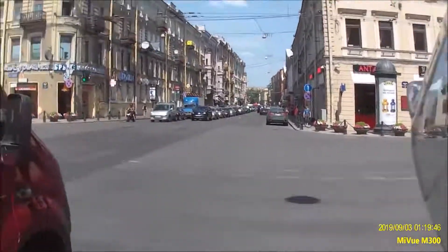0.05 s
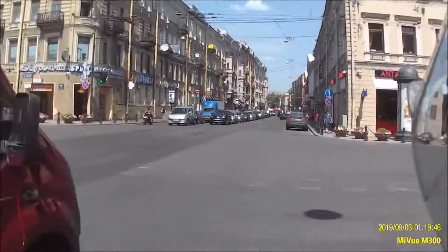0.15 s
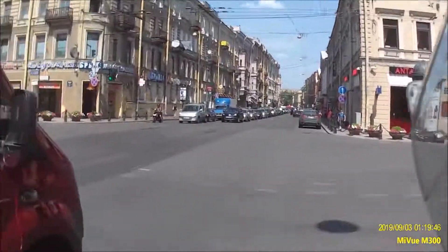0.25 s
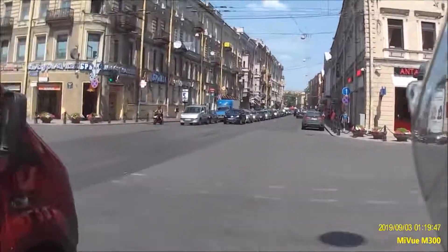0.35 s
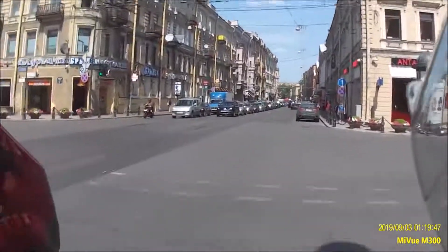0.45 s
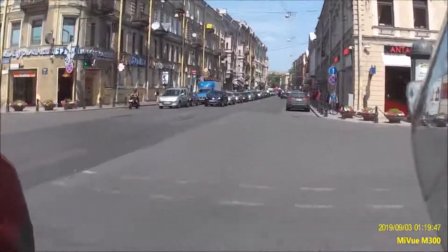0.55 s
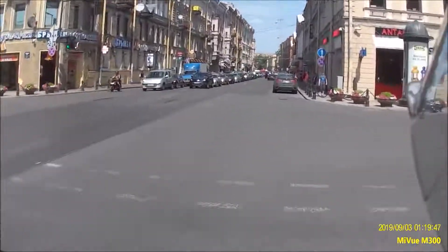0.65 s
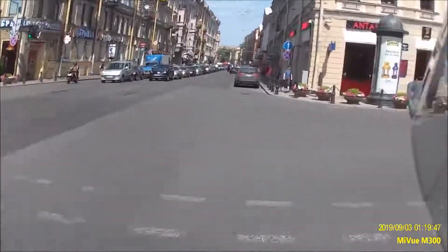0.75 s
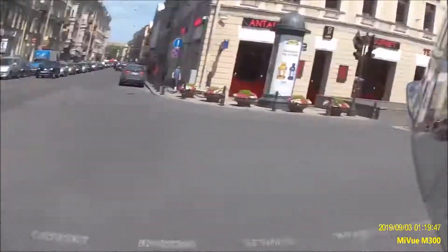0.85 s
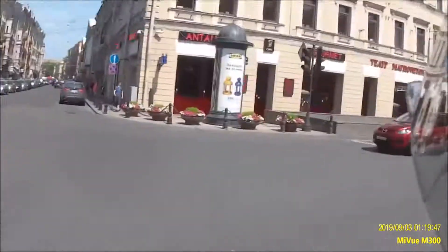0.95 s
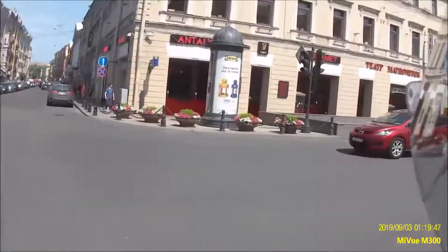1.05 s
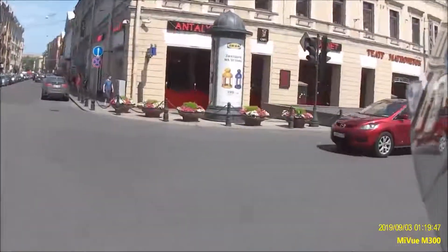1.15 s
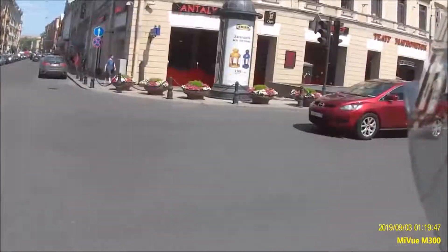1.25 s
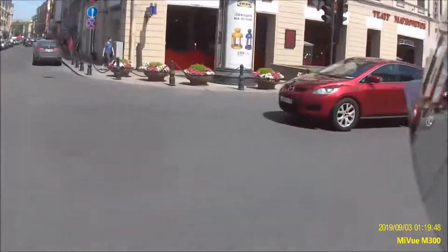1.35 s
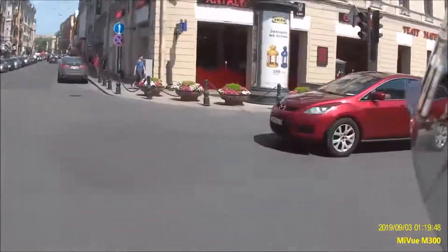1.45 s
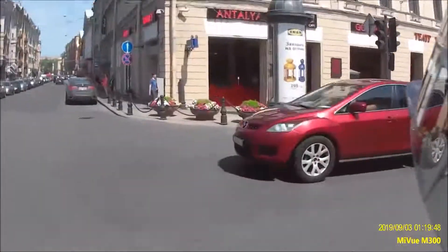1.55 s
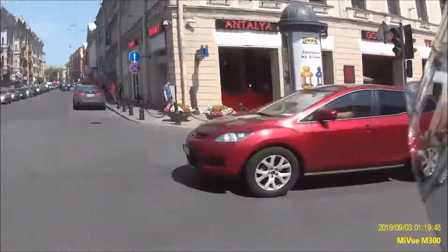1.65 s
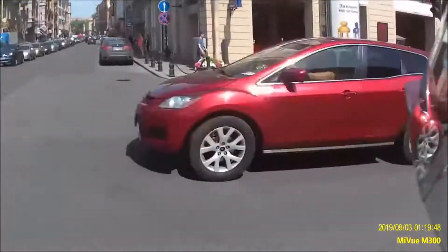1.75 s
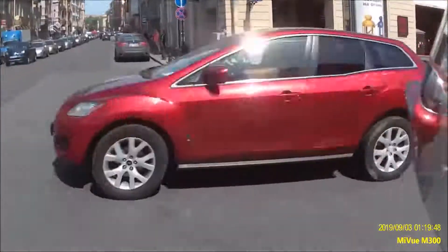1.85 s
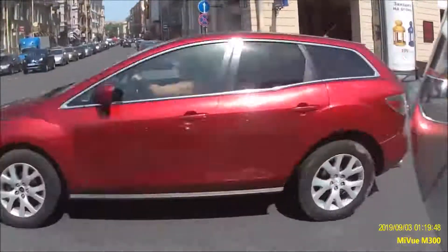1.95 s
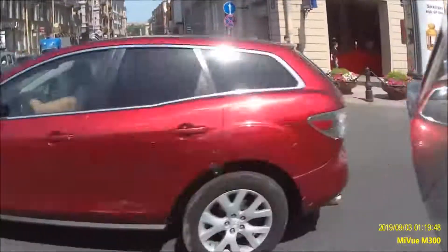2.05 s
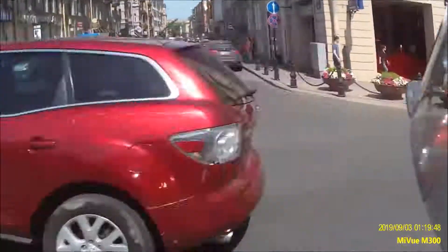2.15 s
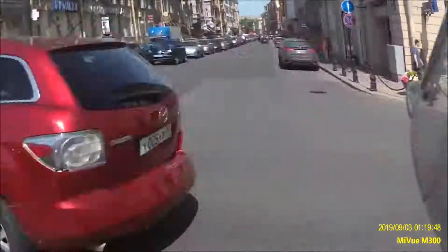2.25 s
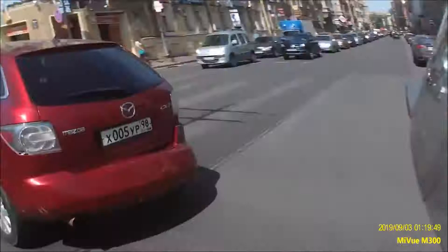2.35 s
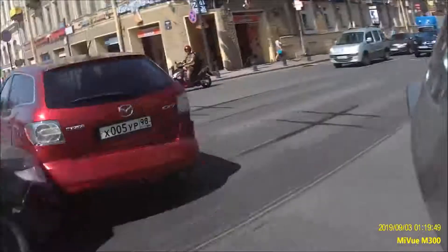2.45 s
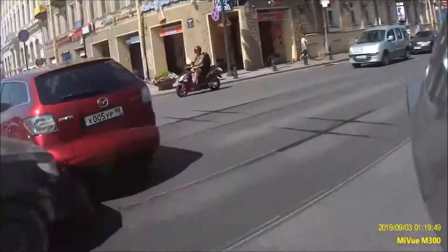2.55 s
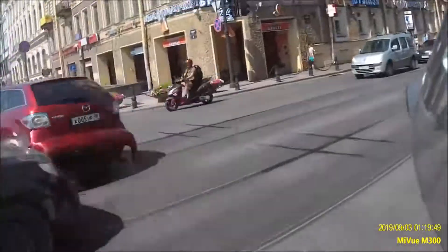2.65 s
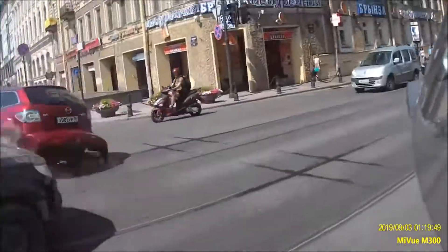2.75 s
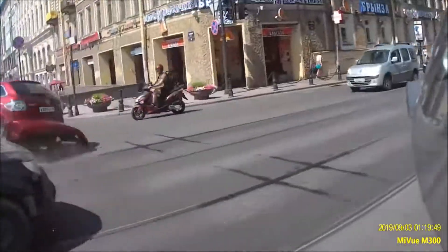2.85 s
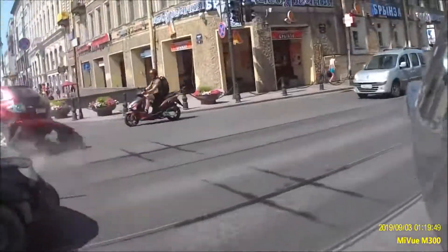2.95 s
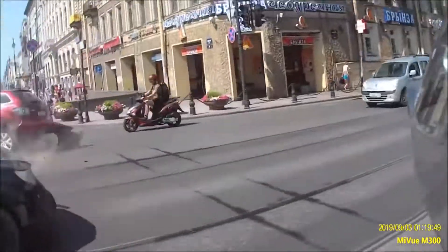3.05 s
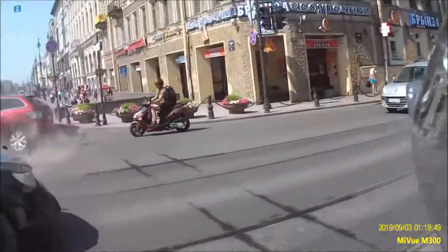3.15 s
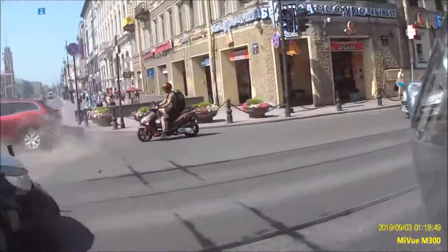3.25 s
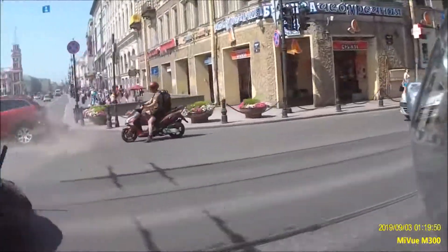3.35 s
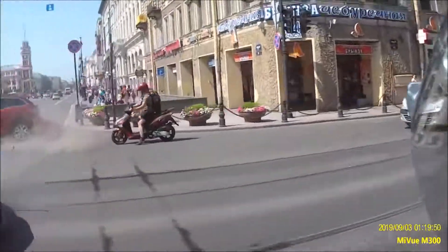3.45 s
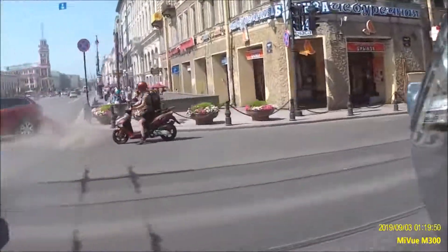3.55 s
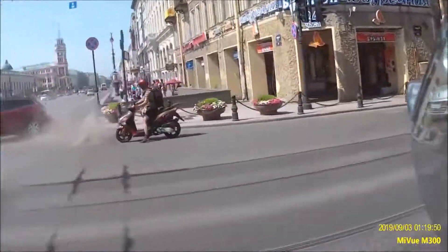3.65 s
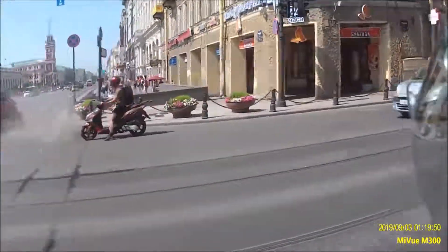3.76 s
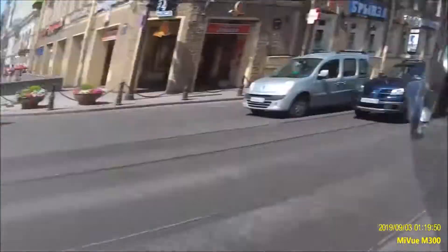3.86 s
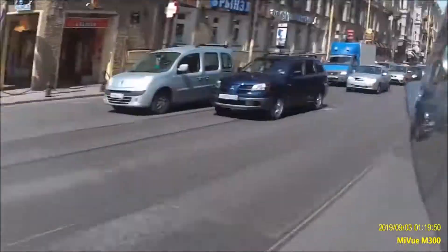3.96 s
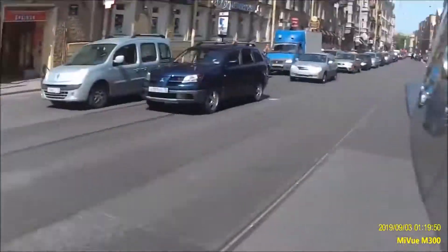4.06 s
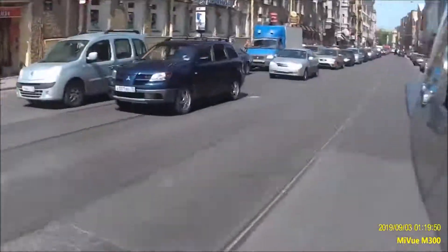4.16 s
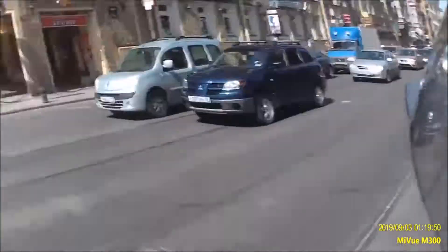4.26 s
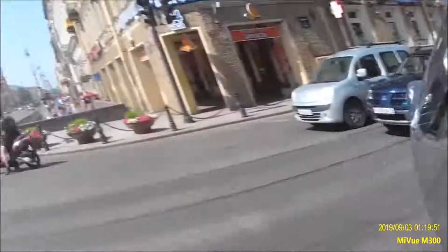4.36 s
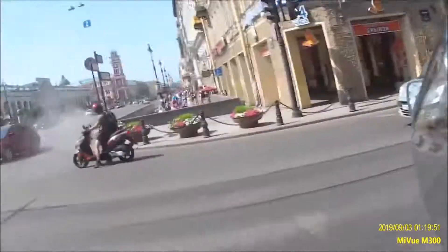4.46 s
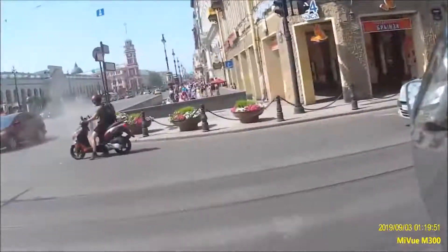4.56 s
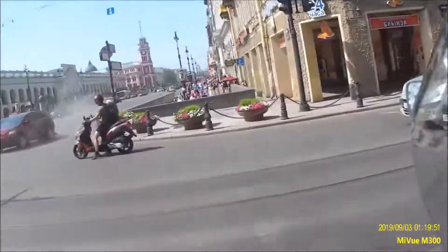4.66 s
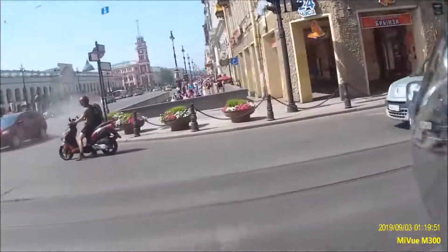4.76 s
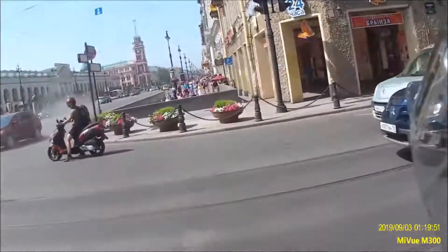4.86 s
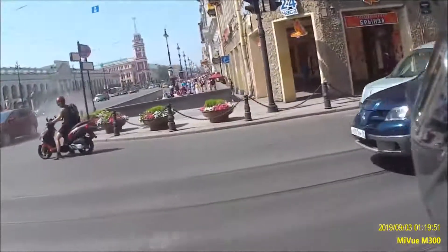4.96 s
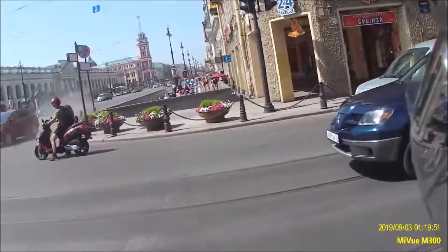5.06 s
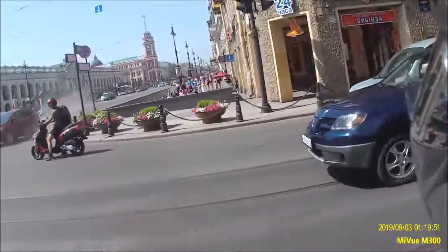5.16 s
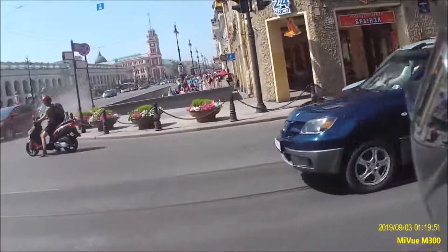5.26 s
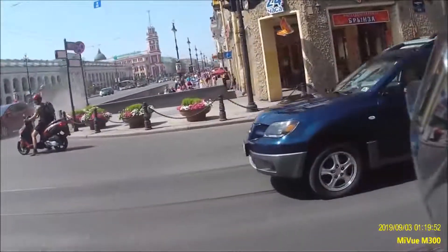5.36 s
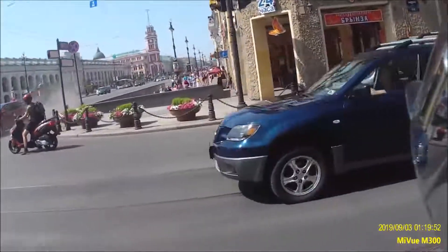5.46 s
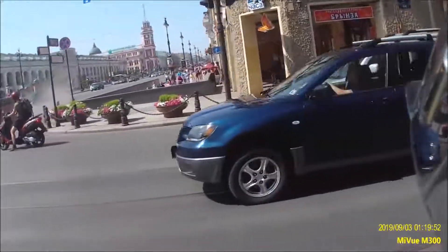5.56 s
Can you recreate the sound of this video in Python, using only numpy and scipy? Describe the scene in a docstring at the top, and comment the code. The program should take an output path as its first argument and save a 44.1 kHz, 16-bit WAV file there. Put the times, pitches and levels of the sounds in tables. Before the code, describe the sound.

A close, boxy microphone rides on a motorcycle at a city crossing, over soft distant traffic. From 0 s the engine clatters with a dry, hissy buzz, its pitch climbing to a peak near 1.8 s. Two short tyre chirps come around 1.0-1.2 s, while wind gusts rumble, flutter and knock on the housing until about 1.7 s. The revs then fall, with a very high, thin brake squeak near 2.35 s. At about 2.65 s cars collide: a hard, bright crack of bodywork with a short thud and narrow ringing noise, smaller blows following to 2.95 s. Wavering tyre squeals cluster from 2.7 to 3.9 s over rough skidding and scraping grit. Fragments rattle, strongest at 3.4-4.0 s, and house fronts scatter brief echoes. The engine sinks away; faint brake squeaks near 4.0, 5.0 and 5.3 s and settling bits end in quiet street noise.

```python
"""A motorcycle engine revs up, falls back and fades at a city crossing, heard through a small, thin housing.
Two cars collide: the bodywork cracks and thuds, with a narrow-toned noise, all from filtered clicks and noise.
Tyres squeal as wavering tones above a skid of filtered noise; grit and fragments are filtered clicks.
Brakes squeak as thin unsteady tones, house fronts scatter the crash back, wind gusts buffet the housing,
and distant traffic lies underneath as filtered noise."""
import sys
import numpy as np
from scipy import signal
from scipy.fft import rfft, irfft, next_fast_len
from scipy.io import wavfile
from scipy.ndimage import uniform_filter1d

SR = 44100
rng = np.random.default_rng(int(sys.argv[2]) if len(sys.argv) > 2 else 0)


def dump(signal):
    """Clip the signal to [-1, 1] and save it as 16-bit WAV at the path in sys.argv[1]."""
    limited = np.clip(np.atleast_2d(signal).T, -1, 1)
    pcm = np.round(limited * 32767).astype(np.int16)
    wavfile.write(sys.argv[1], SR, pcm)


N = 246940  # length in samples
T = np.arange(N) / SR  # time in s

# Everywhere below, t60 is the time in s that a sound takes to fall by 60 dB.


def amp(db):
    """Turns decibels into a gain."""
    return 10 ** (np.asarray(db) / 20)


def noise():
    """Plain hiss, rms 1."""
    return rng.standard_normal(N)


def unit(x):
    """Scales to rms 1."""
    return x / np.sqrt(np.mean(x ** 2) + 1e-20)


def level(rows):
    """Gain over time from (t/s, level/dB) rows, fading fast outside them."""
    s, db = np.transpose(rows)
    outside = np.maximum(np.maximum(s[0] - T, T - s[-1]), 0)
    return amp(np.interp(T, s, db)) * np.exp(-outside / 0.011)


def swell(s, length):
    """A bell-shaped rise and fall around time s."""
    return np.exp(-(2 * (T - s) / length) ** 2)


def decay(s, t60):
    """A sudden start at time s, then an even fall in dB for up to a second."""
    return amp(-60 * np.clip(T - s, 0, 1) / t60) * (T >= s)


def burst(start, length, rise_s, t60):
    """Rises from start, holds until its length is over, then dies away."""
    rise = np.clip((T - start) / rise_s, 0, 1)
    return rise * amp(-60 * np.clip((T - start - length) / t60, 0, 3))


def fade(start, db_per_s):
    """Full gain until start, then an even fall in dB."""
    return amp(-db_per_s * np.maximum(T - start, 0))


def drift(hz):
    """Slow random wandering of rms 1, up to about hz."""
    size = next_fast_len(N, True)
    f = np.fft.rfftfreq(size, 1 / SR)
    smooth = rfft(rng.standard_normal(size)) * np.exp(-(f / hz) ** 2)
    return unit(irfft(smooth, size)[:N])


def cracks(per_s, spread_db):
    """Random clicks of uneven size, rms 1."""
    size = amp(spread_db * np.minimum(rng.exponential(1, N), 4))
    return unit(size * rng.choice([-1, 1], N) * (rng.random(N) < per_s / SR))


def colour(x, spectrum, size=4096):
    """Filters by a (f/Hz, level/dB) curve with steep ends; scaled to energy 1, so only the shape counts."""
    hz, db = np.transpose(spectrum)
    f, edges = np.log(np.fft.rfftfreq(size, 1 / SR) + 1), np.log(hz)
    outside = np.maximum(np.maximum(edges[0] - f, f - edges[-1]), 0)
    gain_db = np.interp(f, edges, db) - 40 * outside
    log_gain = np.log(amp(np.maximum(gain_db, -100)))
    # the Hilbert transform gives the phase that makes the filter react at once, never early
    both_sides = np.r_[log_gain, log_gain[-2:0:-1]]
    taps = np.fft.ifft(np.exp(np.conj(signal.hilbert(both_sides)))).real
    return signal.oaconvolve(x, taps / np.linalg.norm(taps))[:N]


# engine speed: t/s, firing rate f/Hz
ENGINE_SPEED = [(0, 139.4), (.28, 141.6), (.75, 181.3), (.98, 205.1), (1.3, 287), (1.6, 345), (1.72, 362),
                (1.84, 368), (2.05, 338.4), (2.2, 304.4), (2.66, 216.6), (2.8, 239), (3.1, 193), (3.7, 120),
                (4.3, 76), (5.6, 62)]
# exhaust note: t/s, level/dB
EXHAUST_LEVEL = [(0, -92), (.9, -74), (1.15, -57), (1.5, -59.5), (1.7, -67.5), (1.9, -58), (2.05, -70.5),
                 (2.18, -56), (2.35, -56.5), (2.5, -64.5), (3.1, -69.5), (3.3, -76.5), (5.6, -87)]
# valve train and chain: t/s, level/dB before a cut of 1.5 dB
CLATTER_LEVEL = [(0, -44), (.4, -41), (.6, -44), (.95, -39), (1.08, -43), (1.22, -38), (1.7, -38),
                 (2.05, -38), (2.3, -39), (2.55, -44.5), (2.8, -38), (3, -54), (4.33, -55), (4.45, -62.5),
                 (5.6, -80)]
# tones at multiples of the firing rate: gear whine, except the first row, a brief swell of the second harmonic
# near 600 Hz where a fixed resonance rings; multiple of the firing rate, loudest at t/s, length/s, level/dB
GEAR_WHINES = [(1.99, 2.28, 0.2, -73.5), (2.94, 1.95, 0.68, -71), (5.6, 1.06, 0.56, -66),
               (6.5, 1.866, 0.51, -54.5), (9.38, 1.16, 0.65, -55.5), (10.2, 0.66, 0.12, -63),
               (11.2, 0.29, 0.19, -65), (13.1, 0.045, 0.97, -62.5), (17.9, .05, 1, -62.5),
               (23.3, 0.042, 0.31, -60.5)]
# tone of the clatter at low revs: f/Hz, level/dB per Hz (shape only)
LOW_REVS_TONE = [(350, -38.5), (600, -29), (904, -30.5), (1780, -9.5), (2000, -16), (2520, -14.5),
                 (2900, -17), (4780, 0), (6170, -3), (7190, -16), (9290, -17.5), (10300, -21.5),
                 (12000, -16), (12800, -15), (16600, -114), (22000, -120)]
# tone of the clatter at high revs: f/Hz, level/dB per Hz (shape only)
HIGH_REVS_TONE = [(350, -48), (600, -31.5), (765, -36), (1800, -8.5), (2130, -15.5), (2330, -13),
                  (3050, -9), (3420, -1.5), (4260, -2), (5160, -6.5), (6010, -4.5), (7100, -12.5),
                  (10600, -18.5), (12200, -13), (12900, -21)]


def engine(jitter=0.0014, lines=0.7, puff=0.073, count=190):
    """Four firings a cycle: a clean exhaust note, gear whine, and clatter that partly repeats each cycle."""
    hz = uniform_filter1d(np.interp(T, *np.transpose(ENGINE_SPEED)), size=2000, mode="nearest")
    angle = 2 * np.pi * np.cumsum(hz * (1 + jitter * drift(38.6))) / SR
    exhaust = level(EXHAUST_LEVEL) * np.sin(angle) * np.sqrt(2) * amp(1.6 * drift(25))

    # the knocks of one cycle come round again, giving a comb of fine lines
    strengths = rng.standard_normal(count) + 1j * rng.standard_normal(count)
    cycle = irfft(np.r_[0, strengths], 8192)
    place = np.arange(len(cycle)) / len(cycle)
    comb = unit(np.interp(angle / (8 * np.pi), place, cycle, period=1))
    # at low revs the lines span less of the band, so they carry less power
    comb *= np.sqrt(np.minimum(hz * count / (2 * SR), 1))

    # the hiss pulses gently on every second firing
    hiss = unit(noise() * (1 + puff * np.cos(angle / 2)) * amp(0.72 * drift(210)))
    drive = unit(lines * comb + hiss)
    revs = np.clip((hz - 175) / 150, 0, 1)  # 0 is low, 1 is high
    clatter = (1 - revs) * colour(drive, LOW_REVS_TONE) + revs * colour(drive, HIGH_REVS_TONE)

    whine = np.zeros(N)
    for multiple, s, length, db in GEAR_WHINES:
        whine += swell(s, length) * amp(db + 2.5 * drift(25)) * np.sin(multiple * angle)
    return exhaust + amp(-1.5) * level(CLATTER_LEVEL) * clatter + whine


# blows of the collision: start t/s, length/s, force level/dB before the parts are mixed, t60/s
BLOWS = [(2.637, 0.0096, -43, 0.025), (2.655, 0.07, -21, 0.18), (2.679, 0.0067, -23, 0.043),
         (2.829, 0.024, -34.5, 0.18), (2.884, 0.031, -37, 0.21), (2.926, .01, -37.5, 0.17)]
# tone of the cracking bodywork: f/Hz, level/dB per Hz (shape only)
METAL_TONE = [(410, -25), (700, -32), (753, -43), (926, -19.5), (1080, -21), (1430, -7.5), (1760, -4.5),
              (2140, -12), (2600, -8.5), (4180, 2), (5140, -2), (6250, 3), (7500, -8.5), (8890, -11),
              (12800, -13), (16600, -82.5), (22000, -120)]
# tone of the thud: f/Hz, level/dB per Hz (shape only)
THUD_TONE = [(24, -41), (40, 2.5), (92, -23), (190, -0.5), (377, -17), (507, -12), (714, -30), (750, -22),
             (980, -50), (1650, -120)]
# narrow tones that colour the crash noise: f/Hz, level/dB relative to each other, t60/s
CRASH_TONES = [(3680, 0, 0.081), (4030, 2.5, .15), (4260, -4.5, 0.2), (4060, -5, 0.067), (4700, -13, 0.2),
               (4630, 2, 0.1), (4800, -19, .15), (5290, 4.5, 0.086), (5960, -14.5, 0.13), (5800, -20, 0.15),
               (6220, -4, 0.11)]
BLOW_RISE_S = 0.0091


def collision():
    """The bodywork cracks and thuds, with a narrow-toned noise, as the force of the blows rises and falls."""
    force = sum(amp(db) * burst(start, length, BLOW_RISE_S, t60) for start, length, db, t60 in BLOWS)
    breaks = force * cracks(11000, 1.18) * unit(amp(drift(220)))
    t = T[:SR // 2]
    tone_filter = np.zeros(len(t))
    for hz, db, t60 in CRASH_TONES:
        tone_filter += amp(db - 60 * t / t60) * np.sin(2 * np.pi * (hz * t + rng.random()))
    toned_noise = signal.oaconvolve(breaks, tone_filter / np.linalg.norm(tone_filter))[:N]
    thud = colour(force * noise(), THUD_TONE)
    return colour(breaks, METAL_TONE) + amp(-5) * toned_noise + amp(-29.5) * thud


# tyre squeals: start t/s, length/s, pitch at the middle f/Hz, glide in Hz per s, level/dB
TYRE_SQUEALS = [(1.008, 0.068, 1731, -3000, -45), (1.104, 0.11, 1732, 2700, -42),
                (2.728, 0.029, 1448, 1800.5, -36.5), (2.796, 0.037, 1589, 1801, -33.5),
                (2.86, .06, 1567, -2300, -37), (2.93, 0.095, 1296, -1500, -50.5),
                (2.982, 0.097, 1750, 100, -46), (3.105, .09, 1801, 501, -45), (3.218, .13, 1730, -700, -49),
                (3.43, 0.068, 1540, -2400, -48.5), (3.663, 0.29, 1835, 99.5, -52)]
# tone of skidding rubber: f/Hz, level/dB per Hz (shape only)
RUBBER_TONE = [(650, -27.5), (800, -18), (920, -4), (1100, -11), (1400, -4), (1800, 6.5), (2050, 2),
               (2350, -11.5), (2800, -18)]
SQUEAL_RISE_S, SQUEAL_T60 = 0.019, 0.16
SQUEAL_ARCH = .025  # the pitch sags by this share at both ends
# the car's slide: skid and scraping grit both fade as it loses speed
SLIDE_S, SLIDE_LENGTH_S, SLIDE_RISE_S = 2.94, 1, 0.046
SKID_DB, SKID_FALL_DB_PER_S, SKID_T60 = -46, 13.5, 1.3


def tyres(waver=.015, chatter=.028, overtone_db=-4, bite_db=-42):
    """Tread sticks and slips: wavering squeals with smeared overtones above a rough skid."""
    slide = amp(SKID_DB) * burst(SLIDE_S, SLIDE_LENGTH_S, SLIDE_RISE_S, SKID_T60)
    slide = slide * fade(SLIDE_S, SKID_FALL_DB_PER_S)
    out = slide * colour(noise(), RUBBER_TONE) * unit(amp(1.7 * drift(59)))
    for start, length, hz, glide, db in TYRE_SQUEALS:
        # -1 at the start, 0 in the middle, 1 at the end of the hold
        place = np.clip(2 * (T - start) / length - 1, -1.5, 1.5)
        note = hz * (1 - SQUEAL_ARCH * place ** 2) + glide * place * length / 2
        pitch = note * (1 + waver * drift(48.2) + chatter * drift(442))
        angle = 2 * np.pi * np.cumsum(pitch) / SR
        grip = amp(db) * burst(start, length, SQUEAL_RISE_S, SQUEAL_T60)
        # the harder the tread bites, the stronger the overtones
        overtones = np.sin(2 * angle) * drift(167)
        overtones += np.sin(3 * angle) * drift(240)
        overtones += .5 * np.sin(4 * angle) * drift(233)
        tone = np.sin(angle) + amp(overtone_db) * np.sqrt(grip / amp(bite_db)) * overtones
        # the tyre hops, so the note comes and goes in strength
        contact = unit(np.maximum(1 + .5 * drift(70), .2))
        out = out + grip * contact * tone
    return out


# falling fragments: t/s, peak level/dB before a cut of 6.5 dB
FRAGMENT_LANDINGS = [(2.936, -40), (3.3493, -45), (3.4166, -32.5), (3.434, -36), (3.4744, -35),
                     (3.536, -34), (3.6095, -34.5), (3.773, -38.5), (3.813, -40), (4.0231, -35.5),
                     (4.1414, -48), (4.33, -48), (4.5106, -51.5), (4.571, -58), (4.609, -53.5),
                     (4.8549, -54), (5.003, -57.5), (5.3832, -56)]
# tone of the fragments: f/Hz, level/dB per Hz (shape only)
SHARD_TONE = [(1180, -18), (2000, -16), (2230, -17), (3090, -20), (3610, 2.5), (4770, 4.5), (6310, 5.5),
              (9380, -7.5), (11900, -7.5), (12800, -9), (16600, -49), (22000, -120)]
# tone of scraping grit: f/Hz, level/dB per Hz (shape only)
GRIT_TONE = [(1180, -31), (2000, -19), (2470, -14), (2650, -4), (3070, -4.5), (3420, 3), (6310, -4),
             (7370, -15), (7910, -8.5), (9980, -25), (12000, -14.5), (12800, -30), (16600, -34),
             (22000, -120)]
FRAGMENT_T60 = 0.13
GRIT_DB, GRIT_FALL_DB_PER_S, GRIT_LENGTH_S, GRIT_T60 = -43, 11, 1.19, 0.84
# small pieces go on settling afterwards
SETTLE_S, SETTLE_LENGTH_S, SETTLE_DB, SETTLE_FALL_DB_PER_S = 4.5, 0.94, -63.5, 9


def debris():
    """Grit scrapes along the road and settles; larger fragments land in short rattles."""
    grit = colour(cracks(7000, 1.3) * unit(amp(2.1 * drift(34))), GRIT_TONE)
    scrape = amp(GRIT_DB) * burst(SLIDE_S, GRIT_LENGTH_S, SLIDE_RISE_S, GRIT_T60)
    scrape = scrape * fade(SLIDE_S, GRIT_FALL_DB_PER_S)
    settle = amp(SETTLE_DB) * burst(SETTLE_S, SETTLE_LENGTH_S, SLIDE_RISE_S, GRIT_T60)
    settle = settle * fade(SETTLE_S, SETTLE_FALL_DB_PER_S)
    landings = sum(amp(db) * decay(s, FRAGMENT_T60) for s, db in FRAGMENT_LANDINGS)
    rattles = colour(landings * cracks(6000, 2.1), SHARD_TONE)
    return np.hypot(scrape, settle) * grit + amp(-6.5) * rattles


# brake squeaks: loudest at t/s, length/s, pitch f/Hz, pitch waver as a share, level/dB
BRAKE_SQUEAKS = [(2.346, 0.16, 12360, 0.013, -48.5), (3.966, 0.16, 12230, 0.0057, -62),
                 (4.133, 0.14, 12400, .008, -60), (5.006, 0.26, 3930, 0.0055, -59.5),
                 (5.288, 0.13, 5710, 0.0039, -56.5)]


def brakes():
    """Brake discs sing briefly, each on one unsteady note."""
    out = np.zeros(N)
    for s, length, hz, waver, db in BRAKE_SQUEAKS:
        angle = 2 * np.pi * np.cumsum(hz * (1 + waver * drift(400))) / SR
        flutter = amp(2.5 * drift(35))
        out += amp(db) * flutter * swell(s, length) * np.sin(angle)
    return out


# gusts on the housing: start t/s, length/s, rumble level/dB, flutter level/dB before a cut of 0.5 dB
WIND_GUSTS = [(.08, 0.062, -55, -52), (.37, 0.066, -62, -63), (0.527, 0.027, -59, -53),
              (0.964, 0.051, -51.5, -49), (1.018, 0.049, -50, -39), (1.177, 0.12, -52.5, -39.5),
              (1.336, 0.13, -51.5, -43.5), (1.536, 0.067, -52.5, -42), (2.374, .14, -59, -50.5),
              (4.17, 0.2, -64.5, -66)]
# knocks of the housing in the gusts: t/s, peak level/dB
HOUSING_KNOCKS = [(.102, -37), (0.143, -42), (1.057, -33), (1.1, -31.5), (1.204, -28), (1.211, -35),
                  (1.287, -34), (1.305, -35), (1.352, -28), (1.383, -31), (1.394, -34), (1.409, -28.5),
                  (1.46, -34), (1.493, -35), (2.552, -46)]
# tone of the rumble: f/Hz, level/dB per Hz (shape only)
RUMBLE_TONE = [(12, -65.5), (20, 4), (64, 3), (118, 1), (228, -4.5), (292, -7), (465, -15), (530, -14.5),
               (650, -36.5), (840, -21), (1430, -120)]
# tone of the flutter and knocks: f/Hz, level/dB per Hz (shape only)
BUFFET_TONE = [(150, -2.5), (350, -13), (650, -20), (950, -6.5), (1350, -1), (1750, 0.5), (2200, -8),
               (3500, -2), (6000, -2.5), (7500, -17.5), (12500, -21)]
# steady airflow: holds at first, then falls evenly
AIR_DB, AIR_FADE_S, AIR_FALL_DB_PER_S = -60.5, 1.23, 5
GUST_RISE_S, GUST_T60 = 0.024, 0.47


def wind():
    """Moving air gives a lumpy rumble, and gusts that flutter and knock on the housing."""
    push = amp(AIR_DB) * fade(AIR_FADE_S, AIR_FALL_DB_PER_S)
    shake = np.zeros(N)
    for start, length, rumble_db, flutter_db in WIND_GUSTS:
        gust = burst(start, length, GUST_RISE_S, GUST_T60)
        # hypot adds the powers of overlapping gusts
        push = np.hypot(push, amp(rumble_db) * gust)
        shake = np.hypot(shake, amp(flutter_db) * gust)
    rumble = colour(noise(), RUMBLE_TONE) * unit(amp(2 * drift(30)))
    flutter = shake * cracks(7000, 4.1) * unit(amp(1.9 * drift(190)))
    knocks = sum(amp(db) * decay(s, .03) for s, db in HOUSING_KNOCKS) * noise()
    return push * rumble + colour(amp(-0.5) * flutter + knocks, BUFFET_TONE)


def facades(x, t60=0.34):
    """The house fronts scatter sound back as many random echoes, the first after 20 ms."""
    t = T[:SR]
    echoes = rng.standard_normal(SR) * (rng.random(SR) < 2000 / SR)
    taps = echoes * amp(-60 * t / t60) * (t > .02)
    return signal.oaconvolve(x, taps / np.linalg.norm(taps))[:N]


# tone of distant traffic: f/Hz, level/dB per Hz (shape only)
STREET_TONE = [(15, -26.5), (25, 2), (117, -4.5), (441, -10.5), (893, -17.5), (1720, -9), (2230, -14.5),
               (2890, -14.5), (3470, -8.5), (4390, -5), (6670, -11), (7400, -18), (9120, -19),
               (10100, -25.5), (12800, -21), (16600, -35.5), (22000, -120)]


def street():
    """Distant traffic blends into a soft noise whose level wanders slowly."""
    return amp(-65.5) * colour(noise(), STREET_TONE) * amp(drift(5.9))


def scene():
    """Adds all sources; only the crash echoes from the house fronts."""
    background = street()
    crash = collision() + tyres() + debris()
    echoes = amp(-15.0) * facades(crash)
    return (engine() + wind() + crash + echoes + brakes() + background)[None]


# cavity resonances of the housing: f/Hz, width/Hz, level/dB of what each adds
HOUSING_CAVITIES = [(1777, 58, -10), (2500, 350, -16.5), (3460, 220, -10.5), (4300, 147, -5),
                    (4830, 140, -10), (5840, 67, -13), (6320, 173, -11.5), (9050, 400, -9)]
EDGE_HZ = 12900  # the treble is cut above this


def record(dry):
    """The housing's cavities ring along with everything; then a steep filter cuts the top treble."""
    heard = dry
    for hz, width, db in HOUSING_CAVITIES:
        heard = heard + amp(db) * signal.lfilter(*signal.iirpeak(hz, hz / width, SR), dry)
    low_pass = signal.firwin(511, EDGE_HZ, window=("kaiser", 8), fs=SR)
    return signal.oaconvolve(heard, low_pass[None], "same")


dry = scene()
out = record(dry)
dump(out)
```